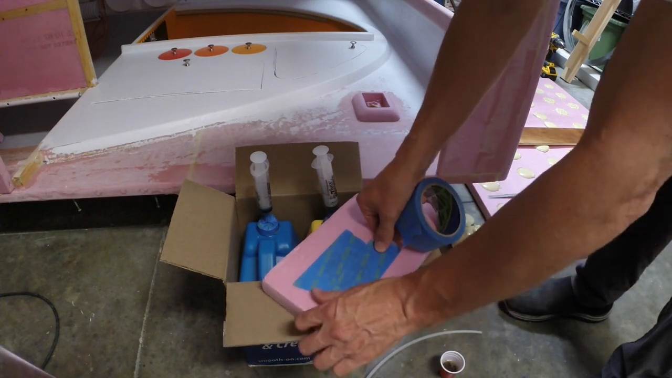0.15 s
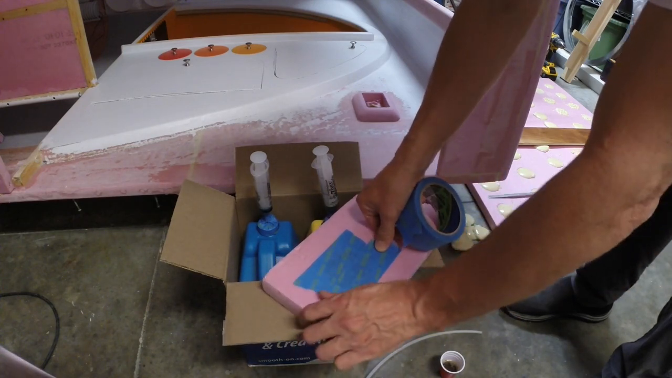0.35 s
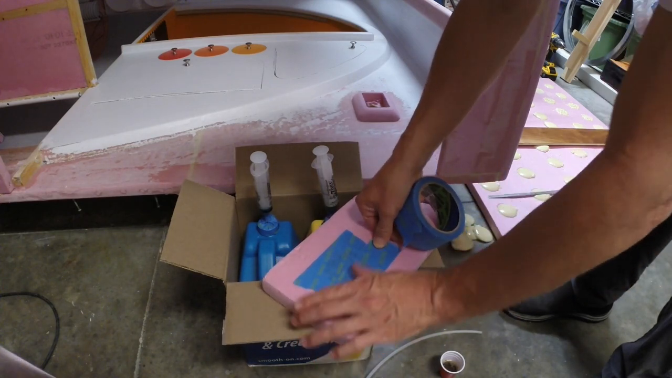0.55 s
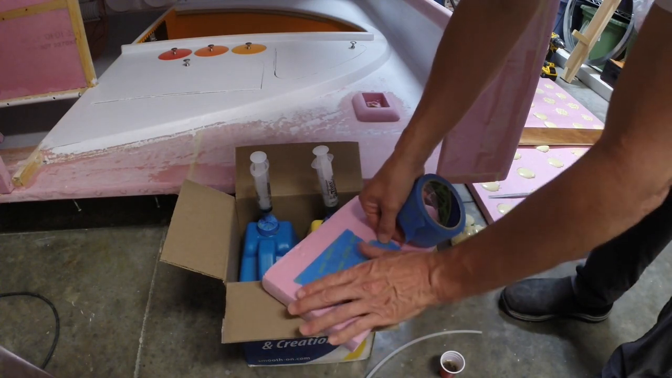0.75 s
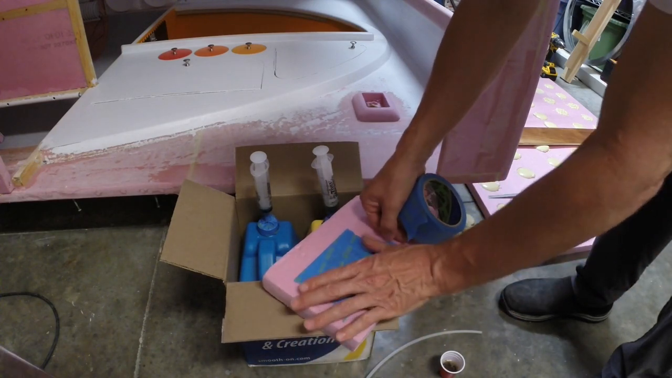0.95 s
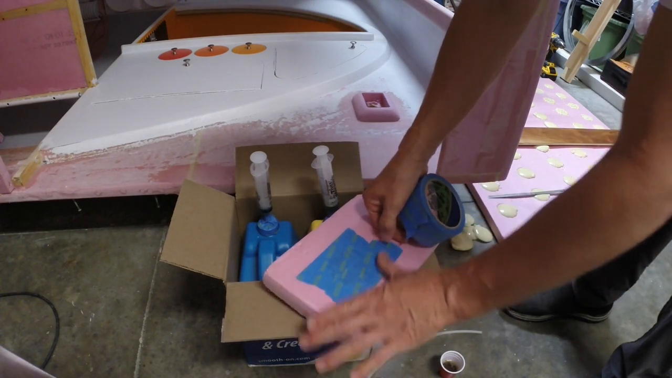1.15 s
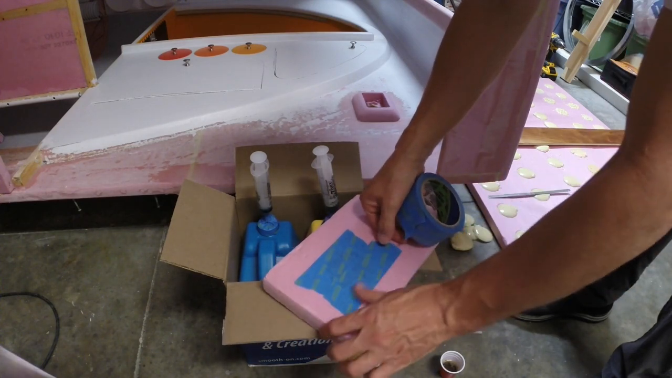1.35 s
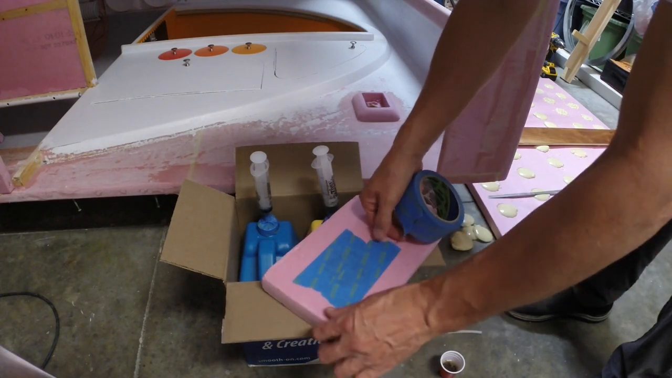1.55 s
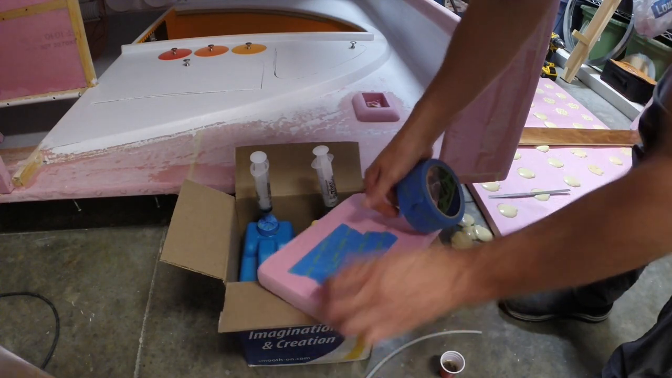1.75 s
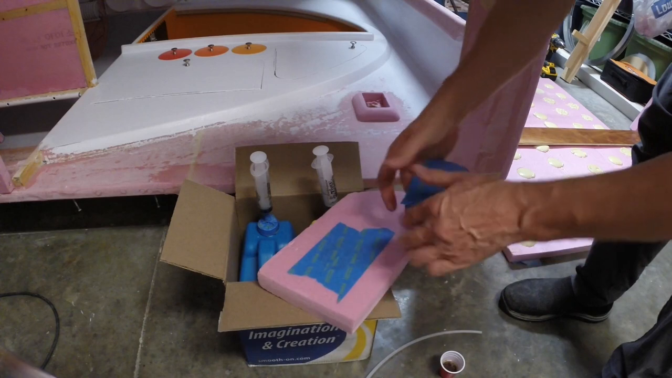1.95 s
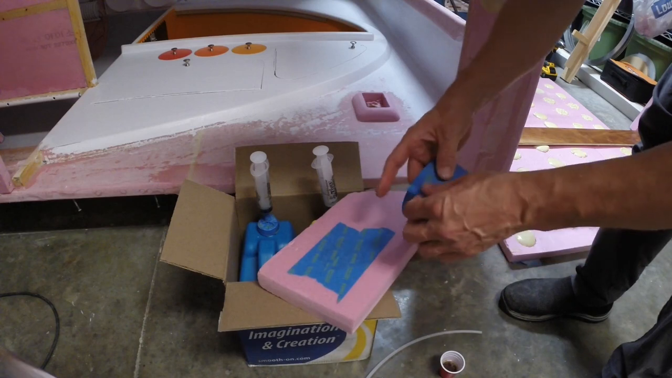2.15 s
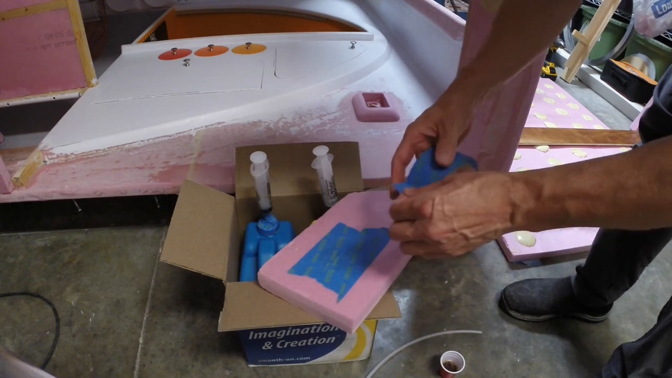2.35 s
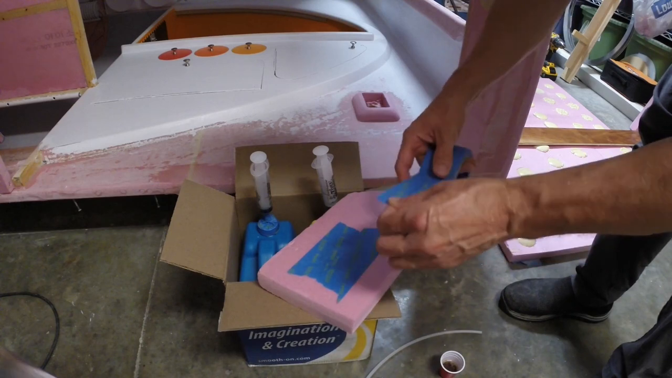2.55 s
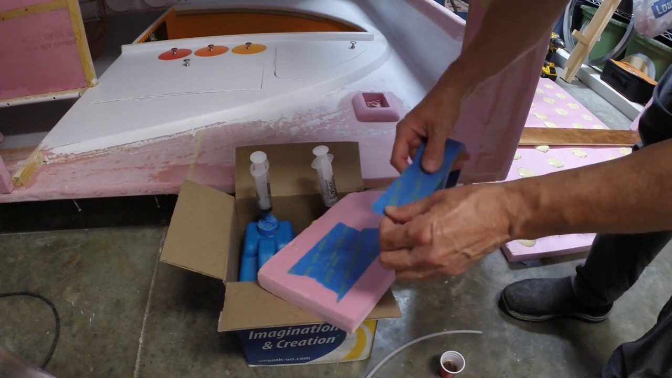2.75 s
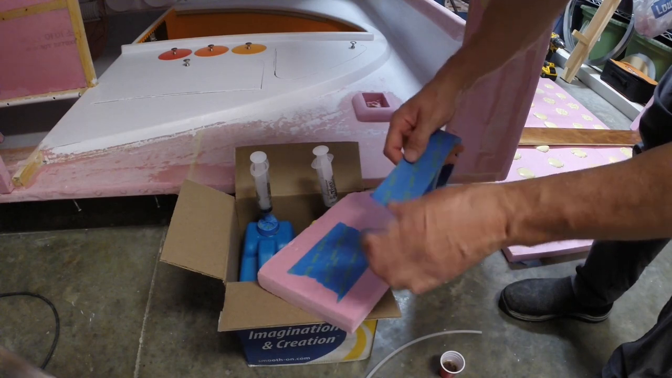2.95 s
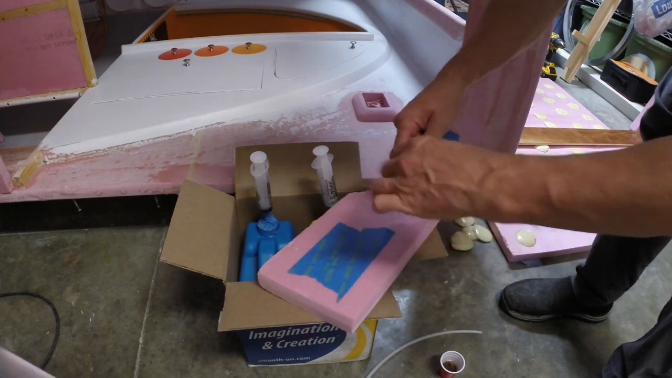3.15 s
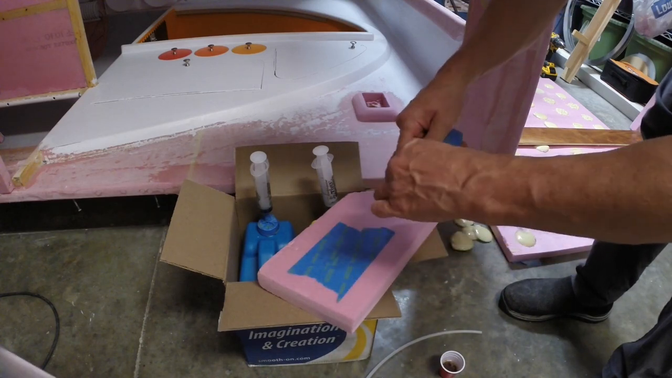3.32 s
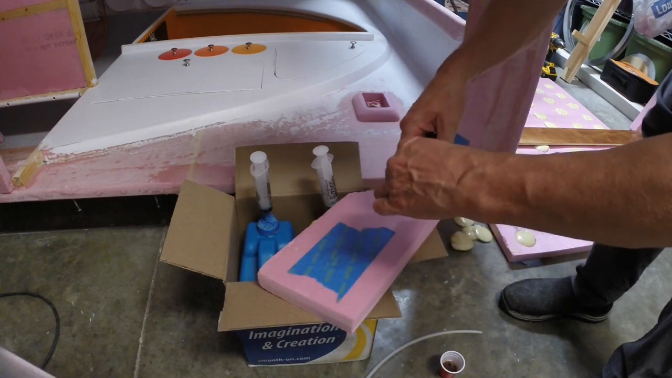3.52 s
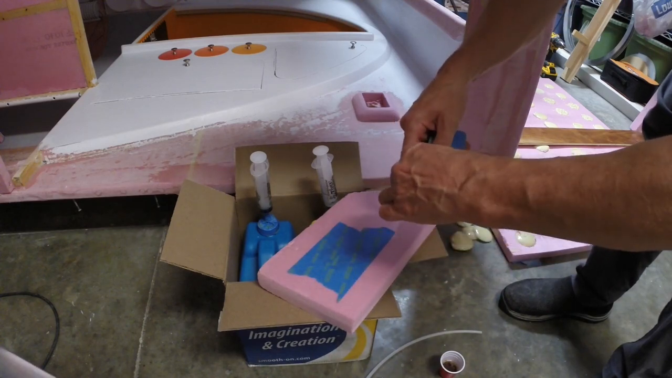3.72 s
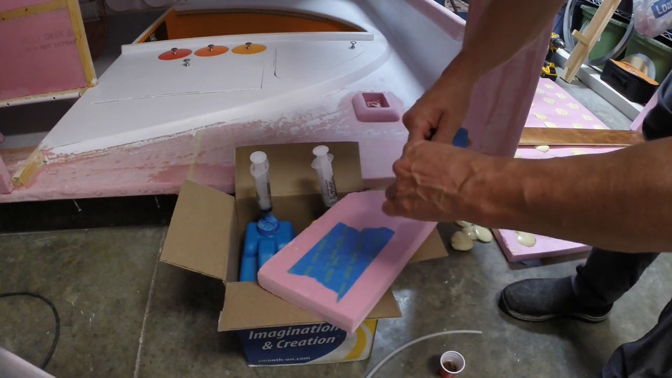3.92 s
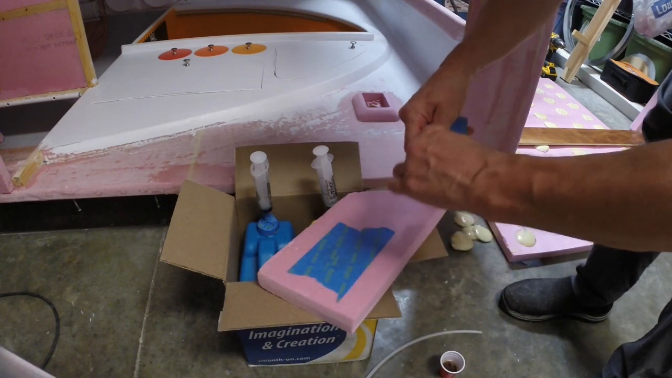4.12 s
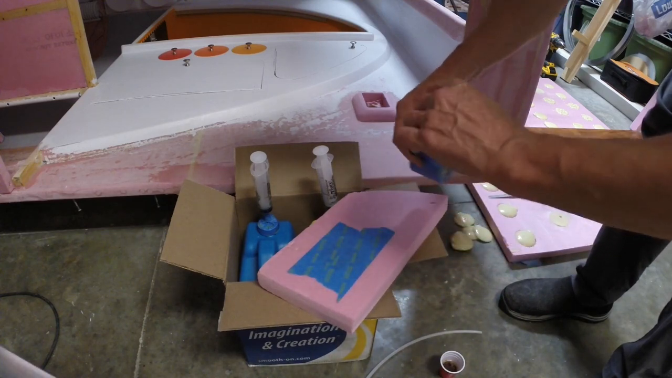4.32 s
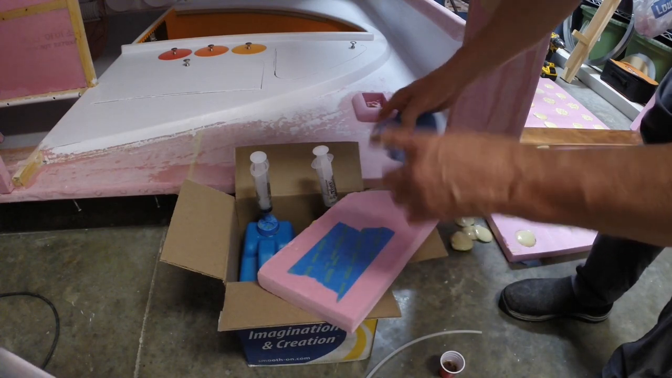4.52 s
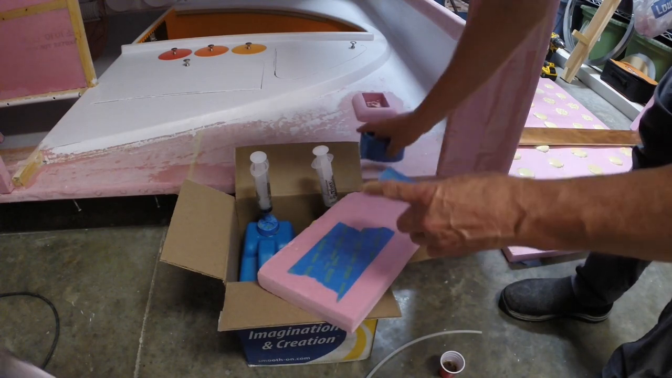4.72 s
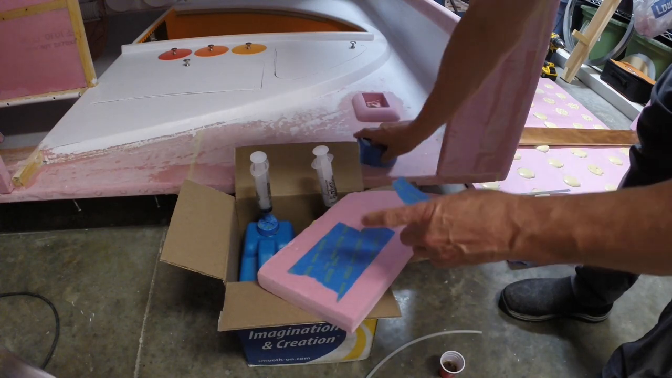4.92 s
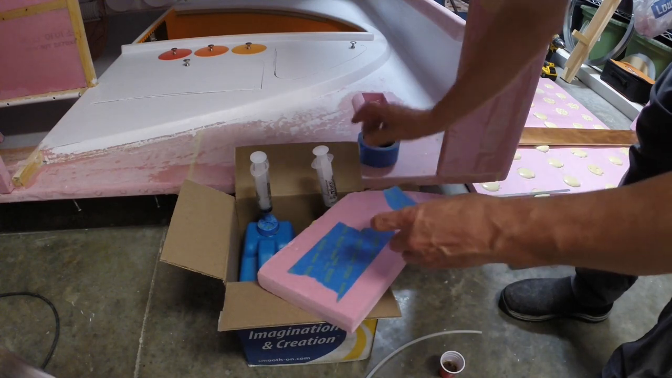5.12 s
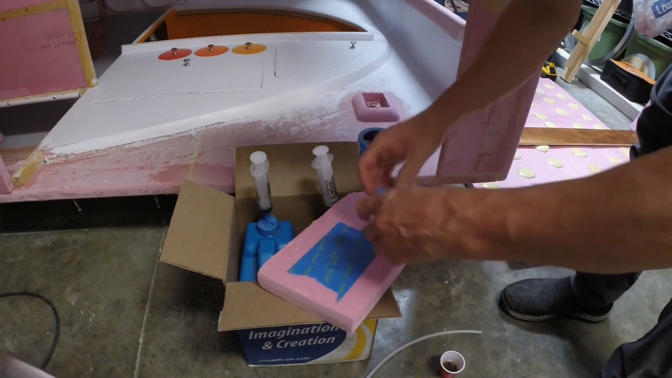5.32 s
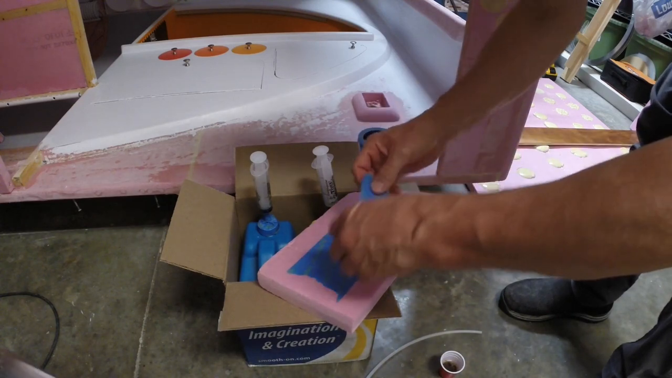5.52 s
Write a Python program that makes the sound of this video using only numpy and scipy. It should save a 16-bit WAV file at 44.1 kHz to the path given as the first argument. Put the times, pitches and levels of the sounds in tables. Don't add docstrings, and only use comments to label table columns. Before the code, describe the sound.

A palm rubs paper tape on foam board, tape is peeled in a crackling tug, torn sharply, then two dull hollow thumps.

```python
import sys
import numpy as np
from scipy import signal
from scipy.fft import rfft, irfft, next_fast_len
from scipy.io import wavfile
from scipy.ndimage import uniform_filter1d, map_coordinates

SR = 44100
rng = np.random.default_rng(int(sys.argv[2]) if len(sys.argv) > 2 else 0)


def natural_amplitude(level_db):
    exponent = np.asarray(level_db, float) / 20
    return 10 ** exponent


def wrap_up_sound(samples):
    columns = np.atleast_2d(samples).T
    tamed = np.clip(columns, -1, 1)
    steps = np.round(tamed * 32767).astype(np.int16)
    wavfile.write(sys.argv[1], SR, steps)


N = 246069
STEP = 8


def unit(x):
    return x / np.sqrt(np.mean(x ** 2) + 1e-20)


def along(points, hz):
    f, v = np.transpose(points)
    return np.interp(np.log(hz + 1), np.log(f + 1), v)


def smooth(coarse):
    return np.interp(np.arange(N), STEP * np.arange(len(coarse)), coarse)


def wobble(rate):
    knots = rng.standard_normal(int(N * 400 / SR))
    return smooth(map_coordinates(knots, [np.arange(0, N, STEP) * rate / SR]))


def swells(rows):
    t = np.arange(0, N, STEP) / SR
    power = 1e-12
    for s, db, rise, hold, fall in rows:
        before = np.maximum(s - t, 0) / rise
        after = np.maximum(t - s - hold, 0) / fall
        power = power + natural_amplitude(db - 20 * (before + after)) ** 2
    return smooth(np.sqrt(power))


def filtered(x, response):
    m = next_fast_len(len(x) + SR // 2)
    return irfft(rfft(x, m) * response(np.fft.rfftfreq(m, 1 / SR)), m)[:len(x)]


def peak(f, hz, width):
    return 1j * f * width / (hz * hz - f * f + 1j * f * width)


def grains(per_second, spread_db, clump_db, patchy_db):
    slips = (rng.random(N) < per_second / SR) * rng.standard_normal(N)
    slips = slips * natural_amplitude(spread_db * rng.exponential(size=N) + clump_db * wobble(150))
    z = signal.stft(slips, nperseg=256)[2]
    field = uniform_filter1d(rng.standard_normal(z.shape), size=3, axis=0)
    field = uniform_filter1d(field, size=9, axis=1)
    return signal.istft(z * natural_amplitude(patchy_db * unit(field)), nperseg=256)[1][:N]


def body(x, spectrum, peaks=(), lift_db=0):
    def colour(f):
        standing = sum(natural_amplitude(lift_db + db) * abs(peak(f, hz, width)) for hz, width, db in peaks)
        return natural_amplitude(along(spectrum, f)) * (1 + standing)
    return unit(filtered(x, colour))


def gliding(x, hz, shapes, width):
    f, t, z = signal.stft(x, nperseg=1024, noverlap=896, fs=SR)
    tone = hz[np.minimum((t * SR).astype(int), N - 1)]
    gain = sum(natural_amplitude(db) * abs(peak(f[:, None], k * tone, width * tone)) ** 2 for k, db in shapes)
    level = np.sqrt(np.mean(gain ** 2, axis=0))
    return unit(signal.istft(z * gain / level, nperseg=1024, noverlap=896)[1][:N])


def singing(x, rows, rise, fall, width):
    out = np.zeros(N)
    for s, db, hz, hold in rows:
        tone = unit(filtered(x, lambda f: peak(f, hz, width * hz) ** 2))
        out += swells([(s, db, rise, hold, fall)]) * tone
    return out


# full pressure in seconds, hiss in dB, rise, hold and fall in seconds.
STROKES = [(0.0, -53.5, .02, 0.0096, 0.082), (0.095, -49.5, 0.0046, 0.0078, .05),
           (0.16, -41.5, 0.061, 0, 0.19), (0.292, -44.5, 0.081, 0.0034, .06),
           (0.37, -50.5, 0.18, 0.00065, 0.37), (0.66, -42.5, 0.3, 0.11, 0.078),
           (0.89, -42.5, 0.15, 0.0038, 0.082), (0.99, -41.5, 0.043, 0.05, 0.15),
           (1.07, -46, .06, 0.0078, .12), (1.2, -40, 0.16, 0.028, 0.19), (1.3, -46, .1, 0.043, .07),
           (1.41, -44.5, 0.044, 0.12, 0.17), (1.55, -42, 0.23, 0.0054, 0.12),
           (1.79, -55, 0.22, 0.00092, 0.3)]
# frequency in Hz, level in dB per Hz.
SKIN_SPECTRUM = [(530, -23.5), (900, -0.5), (1170, -24), (1410, -1), (1710, -3), (3020, -4), (5650, -4),
                 (8560, -13), (11500, -18), (15300, -37)]
# frequency in Hz, width in Hz, level in dB.
FOAM_RESONANCES = [(1435, 130, -5), (3040, 60, 1), (3800, 110, 0), (4860, 100, 0), (5550, 170, 0),
                   (6700, 200, -3), (7200, 60, -2)]
# time in seconds, level in dB, pitch in Hz, hold in seconds.
SQUEAKS = [(.16, -58, 4870, .03), (.2, -60, 1440, .1), (0.26, -53, 453, .03), (.32, -62, 5600, .07),
           (0.542, -52, 984, .03), (.64, -54, 4800, .012), (.65, -59, 1440, .08), (0.71, -55, 3040, 0.078),
           (.72, -55, 5400, .01), (0.897, -55, 4400, .02), (.985, -52, 4270, .065), (1.02, -55, 3840, .06),
           (1.188, -51, 1400, 0.04), (1.21, -54, 3060, .04), (1.31, -60, 1460, .03),
           (1.428, -61, 5500, .05), (1.496, -52, 1410, 0.11), (1.506, -56, 5670, 0.038),
           (1.52, -56, 4840, .04)]
# frequency in Hz, level in dB per Hz.
BOARD_SPECTRUM = [(88, -52), (150, -10), (441, 2.5), (630, 3.5), (1110, -2), (1500, 0.5), (1950, -53),
                  (3300, -120)]
# time in seconds, rumble in dB, rise, hold and fall in seconds.
LEANS = [
    (0.03, -52, 0.19, 0.0055, 0.029),
    (0.16, -46.5, 0.11, 0.14, 0.042),
    (0.62, -46, 0.35, 0.011, 0.28),
    (0.96, -52.5, 0.63, 0.06, .2),
    (1.21, -49, 0.15, 0.11, 0.24),
    (1.44, -46, 0.17, 0.061, 0.21),
    (1.73, -55, 0.082, 0.0041, 0.23),
]
# time in seconds, peak in dB, pitch in Hz.
KNUCKLES = [
    (0.271, -30, 342),
    (0.498, -49, 300),
    (0.598, -37, 510),
    (0.6247, -29.5, 523),
    (0.651, -50, 415),
    (0.673, -30.5, 480),
    (1.867, -49, 80.7),
    (1.883, -35, 86.1),
]


def rubbing():
    press = swells(STROKES)
    ridge_hz = np.maximum(4100 + 42 * (20 * np.log10(press) + 27), 2050)
    drag = grains(36000, spread_db=0.8, clump_db=0.6, patchy_db=1.6)
    ridges = gliding(drag, ridge_hz, [(0.88, 0)], width=0.91)
    hiss = body(drag, SKIN_SPECTRUM, FOAM_RESONANCES, lift_db=-4.0) + natural_amplitude(-14.5) * ridges

    air_gain = natural_amplitude(-29 + 7.5 * np.arange(N) / SR)
    air = air_gain * unit(filtered(drag, lambda f: abs(peak(f, 11100, 6000)) ** 2))
    squeaks = singing(drag, SQUEAKS, rise=0.03, fall=0.03, width=0.08)

    flexing = body(grains(2500, spread_db=-0.5, clump_db=1.5, patchy_db=1.0), BOARD_SPECTRUM)
    rumble = np.hypot(natural_amplitude(-16.5) * press, swells(LEANS)) * flexing
    out = natural_amplitude(-1.5) * (press * (hiss + air) + squeaks + rumble)

    t = np.arange(SR // 20) / SR
    for s, db, hz in KNUCKLES:
        bump = natural_amplitude(db - 60 * t / 0.014) * np.sin(2 * np.pi * hz * t)
        out[round(s * SR):][:len(t)] += bump
    return out


# frequency in Hz, level in dB per Hz.
HUM_SPECTRUM = [(13, -66), (22, -0.5), (97, -7), (202, -7), (266, -7.5), (331, -12), (401, -10),
                (447, -12.5), (732, -17), (990, -16.5), (3890, -27.5), (6030, -31), (15300, -42.5)]
# frequency in Hz, level in dB per Hz.
RUMBLE_SPECTRUM = [(25, -32), (45, 2.5), (80, 7.5), (150, -1), (300, -36)]
# time in seconds, level in dB, rise, hold and fall in seconds.
SHIFTS = [
    (0.2, -68, .3, 0.44, 2),
    (1.6, -58, 2, 0, 0.34),
    (1.9, -54.5, 0.12, 0, 0.12),
    (2.65, -63.5, 0.88, 0.036, .2),
    (3.88, -57, 0.086, 0.025, 0.28),
    (4.22, -60, 0.18, 0.11, 0.38),
    (4.86, -60, 0.53, 0, .07),
    (5.2, -55, .05, 0.029, 0.43),
]


def hum():
    air = natural_amplitude(-56.5 + 0.9 * wobble(4.6)) * body(rng.standard_normal(N), HUM_SPECTRUM)
    rumble = np.hypot(natural_amplitude(-70), swells(SHIFTS)) * body(rng.standard_normal(N), RUMBLE_SPECTRUM)
    return air + rumble


# time in seconds, level in dB, rise, hold and fall in seconds.
FLICKS = [
    (1.8615, -40.5, .0006, 0.0063, .04),
    (1.877, -36.5, 0.025, 0.0051, 0.023),
    (1.9, -47, .01, 0.013, 0.082),
]
# frequency in Hz, level in dB per Hz.
SWIPE_SPECTRUM = [(120, -28), (200, -6), (605, -13.5), (809, -1), (1120, -9), (1420, 0), (1730, -6.5),
                  (3920, -4), (15300, -23)]
# time in seconds, level in dB, rise and fall in seconds.
TOUCHES = [(1.98, -67, .03, 0.17), (2.271, -60, .25, 0.038), (2.41, -61.5, .25, .02),
           (2.73, -72.5, .02, 0.16), (2.86, -57, 0.025, 0.17), (2.93, -49.5, .005, 0.096),
           (2.99, -56, .05, .015), (3.055, -60, .04, .03), (3.089, -64, .05, .04),
           (3.341, -64, 0.039, 0.23), (3.555, -54.5, 0.075, 0.095), (3.572, -37.5, 0.0066, 0.038),
           (3.6, -55.5, .01, 0.22), (3.83, -57, 0.054, 0.18), (4.04, -68, .07, 1), (4.41, -53, .01, 0.28),
           (4.595, -43, .002, 0.053), (4.633, -47.5, .006, 0.024), (4.694, -58.5, 0.099, 1),
           (4.839, -48, 0.0049, 0.038), (5.3, -85, .3, 0.046), (5.469, -56, .002, .15),
           (5.537, -43.5, .003, .03), (5.56, -49.5, 0.044, 0.052)]
# frequency in Hz, level in dB per Hz.
PAPER_SPECTRUM = [(350, -29), (600, 10.5), (842, -8), (1370, -1), (2140, 2.5), (2420, 4), (4220, 3.5),
                  (7070, 1), (9650, -8.5), (11100, -6.5), (15300, -24)]
# frequency in Hz, width in Hz, level in dB.
CREASE_RESONANCES = [(5400, 520, -4.5), (6800, 100, -11)]
# time in seconds, level in dB, rise, hold and fall in seconds.
SCUFFS = [
    (4.928, -48, .001, 0.091, 0.12),
    (5.086, -56.5, 0.0044, 0.016, 0.083),
]
# frequency in Hz, level in dB per Hz.
SCUFF_SPECTRUM = [(530, -19), (900, 6.5), (966, -8.5), (1750, -3), (1900, 2), (2040, -5), (7080, -8.5),
                  (13100, -32), (15300, -46)]


def rustling():
    swipe = body(grains(17000, spread_db=-1.3, clump_db=0.5, patchy_db=1.9), SWIPE_SPECTRUM)
    shifting = grains(14000, spread_db=-5.0, clump_db=2.0, patchy_db=2.0)
    rustle = body(shifting, PAPER_SPECTRUM, CREASE_RESONANCES, lift_db=-3.0)
    scuff = body(grains(22000, spread_db=0.5, clump_db=-1.5, patchy_db=1.5), SCUFF_SPECTRUM)
    touch = swells([(s, db, rise, 0, fall) for s, db, rise, fall in TOUCHES])
    return touch * rustle + swells(FLICKS) * swipe + swells(SCUFFS) * scuff


# time in seconds, crackle in dB, rise, hold and fall in seconds.
PULL = [
    (2.47, -40.5, 0.05, 0.0084, 0.11),
    (2.51, -39, 0.047, 0.038, 0.21),
    (2.6, -41.5, 0.1, 0.051, 0.053),
]
# frequency in Hz, level in dB per Hz.
GLUE_SPECTRUM = [(410, -15), (700, -8.5), (942, -1.5), (1200, -9), (1520, -6.5), (2240, -13), (3340, -9.5),
                 (5960, -8), (11500, -25.5), (15300, -32)]
# frequency in Hz, width in Hz, level in dB.
CORE_RESONANCES = [(1460, 94, -31), (2030, 70, 6), (2733, 38, 18.5), (3250, 170, 12.5), (3960, 35, 10)]
# multiple of its tone, level in dB.
STRIP_SHAPES = [(1, 0), (1.7, -10), (3.7, -5), (6, -10)]
# time in seconds, level in dB, rise, hold and fall in seconds.
SAG = (2.635, -46.5, 0.01, 0.0448, 0.01)
# time in seconds, level in dB, pitch in Hz, hold in seconds.
SQUEALS = [
    (2.458, -50, 3300, .025),
    (2.462, -51, 2050, .025),
    (2.488, -48, 1500, .006),
    (2.508, -48, 3450, .005),
    (2.526, -46, 2780, .01),
    (2.51, -49, 950, .02),
    (2.54, -50, 500, .008),
    (2.6, -53, 3250, .045),
    (2.64, -57, 950, .012),
]


def peeling():
    short_hz, long_hz = 2050, 279
    freed = np.clip((np.arange(N) / SR - 2.458) / 0.17, 0, 1)
    length = 1 + (short_hz / long_hz - 1) * freed ** 1.5
    octaves = np.log2(length)
    tone = short_hz / length * np.exp(0.04 * wobble(55))

    slips = grains(26000, spread_db=1.17, clump_db=-0.1, patchy_db=2.0)
    crackle = body(slips, GLUE_SPECTRUM, CORE_RESONANCES, lift_db=-5.5)
    flutter = natural_amplitude(-2.5 - 2 * octaves) * gliding(slips, tone, STRIP_SHAPES, width=0.34)
    drone = gliding(slips, tone, [(0.99, 0)], width=0.17)
    pulled = swells(PULL) * (crackle + flutter + natural_amplitude(-13 - 3 * octaves) * drone)
    squeals = singing(slips, SQUEALS, rise=0.015, fall=0.016, width=0.13)
    return natural_amplitude(-1.3) * pulled + swells([SAG]) * drone + squeals


# time in seconds, peak in dB, ring in Hz.
JERKS = [
    (2.4915, -31, 1500),
    (2.5145, -30, 1000),
    (2.5245, -29, 900),
    (2.532, -34, 800),
    (2.543, -29, 700),
    (2.58, -32, 900),
    (2.6, -33, 1300),
    (2.6485, -32, 1000),
]
# time in seconds, peak in dB, ring in Hz.
TICKS = [(2.777, -47, 5184), (2.851, -46, 5000), (2.857, -42, 5050), (2.868, -42, 5200), (2.878, -46, 5100),
         (2.889, -46, 5000), (2.915, -37, 5000), (2.951, -40, 4700), (2.974, -40, 3820),
         (2.9915, -38.5, 5280), (2.995, -39, 3500), (3.037, -45, 5200), (3.043, -48, 5200),
         (3.0516, -36, 5160), (3.0845, -42, 5150), (3.091, -48, 5170), (3.34, -46, 5170), (3.36, -48, 4530),
         (3.5278, -35, 5030), (3.6395, -34, 1100), (3.6405, -40, 2400), (3.8056, -44, 3390),
         (3.8222, -36, 5260), (3.9319, -36, 1150), (3.936, -42, 2300), (4.571, -31, 1960),
         (4.603, -40, 800), (4.628, -33, 4450), (4.634, -33, 2020), (4.835, -32, 1000), (4.835, -31, 2900)]
# time in seconds, peak in dB, ring in Hz, dull part in dB, air in dB.
SNAPS = [(2.9236, -25, 5400, -10, -20), (3.568, -29.5, 5550, -10, -19), (3.572, -26.5, 4700, -5.5, -27),
         (3.6396, -40.5, 3600, -0.5, -28), (3.822, -31.5, 2800, -10.5, -37), (3.9323, -42, 3580, -2, -30),
         (4.5706, -27.5, 3390, -14, -32), (4.5933, -34, 3360, -8, -19), (4.634, -34.5, 5750, -19, -28),
         (4.8354, -26, 5040, -11, -13), (4.9282, -38, 4670, -12, -37), (5.0847, -44.5, 2530, 0, -38),
         (5.476, -48.5, 2930, 5.5, -22), (5.48, -36, 3000, -2.5, -18), (5.543, -29, 6040, -10.5, -28),
         (5.4845, -35.5, 2650, -7, -30)]
# time in seconds, peak in dB, ring in Hz, dull part in dB, air in dB.
CLICKS = [
    (4.243, -28, 4500, -12, -18),
    (4.259, -21, 3200, -15, -20),
    (4.2613, -16, 4800, -13, -16),
    (4.594, -33, 4500, -14, -15),
    (4.629, -28, 5500, -24, -20),
    (4.8475, -35, 6000, -16, -13),
]
# time in seconds, peak in dB, ring in Hz.
BREAKS = [(4.2671, -18, 3000), (4.2775, -19, 3300), (4.2852, -17, 4000), (4.2867, -15, 3900),
          (4.2897, -13, 3000), (4.2927, -17, 3300), (4.3015, -16, 4800), (4.3058, -15, 3900),
          (4.3112, -15, 3600), (4.317, -16, 3500), (4.3247, -14, 5300), (4.333, -20, 4000)]


def fingers():
    # dull part and air in dB where missing, then t60 in seconds and width as a share of the ring
    rows = [(*row, 0.014, 0.47) for row in SNAPS]
    rows += [(*row, 0.003, 0.8) for row in CLICKS]
    rows += [(*row, -32, -34, 0.014, 0.22) for row in TICKS]
    rows += [(*row, -17, -20, 0.003, 0.8) for row in [*BREAKS, *JERKS]]
    out = np.zeros(N + SR)
    t = np.arange(SR // 10) / SR
    for s, db, hz, dull_db, air_db, t60, width in rows:
        def colour(f):
            ring = 1.23 * peak(f, hz, width * hz) ** 2
            dull = natural_amplitude(dull_db + 9) * peak(f, 1250, 1700) ** 2
            air = natural_amplitude(air_db + 6.0) * peak(f, 10100, 4050) ** 2
            return ring + dull + air
        burst = rng.standard_normal(len(t)) * natural_amplitude(-60 * t / t60) * (1 - np.exp(-t / 0.00027))
        blow = burst + 3 * (t == 0)
        out[round(s * SR):][:len(t)] += natural_amplitude(db + 3.5) * filtered(blow, colour)
    return filtered(out[:N], lambda f: 1 / np.sqrt(1 + (f / 11500) ** 8))


# time in seconds, level in dB, pitch in Hz.
PINGS = [
    (2.9233, -11.5, 5300),
    (2.9349, -25, 6400),
    (4.5933, -26, 3300),
    (4.629, -25, 4700),
    (4.8352, -18, 5250),
]


def pings():
    out, t = np.zeros(N), np.arange(SR // 50) / SR
    for s, db, hz in PINGS:
        envelope = natural_amplitude(db - 60 * t / 0.005) * (1 - np.exp(-t / 0.0004))
        out[round(s * SR):][:len(t)] += envelope * np.sin(2 * np.pi * hz * t)
    return out


# time in seconds, level in dB, rise, hold and fall in seconds.
RIP = [
    (4.2435, -38, 0.00093, 0.011, 0.011),
    (4.26, -31, .0015, 0.0017, 0.047),
    (4.278, -26, 0.0085, .005, 0.038),
    (4.292, -24.5, 0.03, 0.03, 0.029),
    (4.345, -41.5, .02, 0.021, 0.062),
]
# frequency in Hz, level in dB per Hz.
FIBRE_SPECTRUM = [(180, -47), (300, -21), (500, -35), (599, -20), (1120, -10), (1500, -12.5), (1720, -8),
                  (2310, -8.5), (3840, -4.5), (11200, -19), (15300, -37)]
# frequency in Hz, width in Hz, level in dB.
TAUT_RESONANCES = [(3390, 75, -3.5), (4000, 180, -13), (5520, 90, 1), (6960, 200, 2.5), (7550, 30, -14),
                   (11000, 81, -16), (11700, 53, -14)]
# time in seconds, level in dB, pitch in Hz, hold in seconds.
TWANGS = [
    (4.262, -37, 3200, .008),
    (4.282, -34, 6900, 0.011),
    (4.289, -29, 2900, .005),
    (4.31, -34, 5650, .006),
    (4.325, -33, 5700, .004),
    (4.272, -38, 1600, .012),
]


def tearing():
    rip = grains(26000, spread_db=1.2, clump_db=2.2, patchy_db=1.5)
    rush = swells(RIP) * body(rip, FIBRE_SPECTRUM, TAUT_RESONANCES, lift_db=0.5)
    twangs = singing(rip, TWANGS, rise=0.004, fall=0.008, width=0.16)
    started = np.arange(N) / SR > RIP[0][0] - 0.001
    return started * (rush + twangs)


# time in seconds, boom in dB, hold and fall in seconds.
LANDINGS = [
    (4.926, -20, 0.032, 0.016),
    (5.081, -18, 0.057, 0.072),
]
# level in dB, fall in seconds.
SLAPS = [
    (-37.5, 0.17),
    (-24.5, 0.1),
]
# frequency in Hz, level in dB.
PANEL_MODES = [
    [(95, -9), (124, -4), (151, 2.5), (200, -9), (280, -13), (355, -22), (420, -25), (571, -30), (678, -33),
     (856, -34)],
    [(68, -20), (92, -10), (124, -3), (161, 2.5), (234, -8), (277, -1), (312, -20), (357, -13), (402, -19),
     (436, -19), (526, -21), (624, -24), (807, -28), (969, -35)],
]
IN_STEP_S = [
    .0238,
    .025,
]
# frequency in Hz, level in dB per Hz.
SLAP_SPECTRUM = [(180, -13), (300, -4), (486, -14), (801, -22.5), (1060, -33.5), (1290, -33), (1960, -42),
                 (3000, -48), (3900, -80), (6600, -120)]
# time in seconds, boom in dB, rise, hold and fall in seconds.
REBOUNDS = [
    (4.983, -26, 0.012, 0.0071, 0.029),
    (5.033, -39, .02, 0.0083, 0.03),
    (5.186, -25, .015, 0.0045, 0.018),
    (5.23, -31.5, 0.011, 0.013, 0.044),
]
# time in seconds, peak in dB, pitch in Hz, t60 in seconds.
KNOCKS = [
    (4.926, -35, 390, 0.029),
    (4.929, -38, 690, .05),
    (5.083, -20, 506, 0.042),
    (5.0845, -23.5, 800, 0.045),
    (5.084, -37.5, 1100, .04),
    (5.086, -50, 2600, .03),
]


def thumps():
    ring_db, ring_fall = -20.5, 0.21
    out = np.zeros(N)
    landings = zip(LANDINGS, SLAPS, PANEL_MODES, IN_STEP_S)
    for (s, boom_db, hold, fall), (slap_db, slap_fall), modes, in_step in landings:
        t = np.arange(N) / SR - s
        since = np.maximum(t, 0)
        ring = np.zeros(N)
        for hz, db in modes:
            lag = np.pi / 2 * (hz > 190)
            phase = 2 * np.pi * hz * (t - in_step) - lag + hz / 900 * wobble(14)
            build = 1 - np.exp(-since * hz / 0.57)
            ring += natural_amplitude(db + 1.5 * wobble(28)) * np.cos(phase) * build
        ring = ring / np.std(ring[t > 0])
        slap = body(grains(15000, spread_db=0.0, clump_db=1.5, patchy_db=0.5), SLAP_SPECTRUM)

        contact = 1 - np.exp(-since / 0.0014)
        rocking = [row for row in REBOUNDS if 0 < row[0] - s < 0.155]
        boom = swells([(s, boom_db, 1, hold, fall),
                       (s, boom_db + ring_db, 1, hold + fall, ring_fall)] + rocking)
        slap_gain = swells([(s, slap_db, 1, 0.03, slap_fall),
                            (s, slap_db + ring_db, 1, slap_fall, ring_fall)])
        out += contact * (boom * ring + slap_gain * slap)

    t = np.arange(SR // 10) / SR
    for s, db, hz, t60 in KNOCKS:
        out[round(s * SR):][:len(t)] += natural_amplitude(db - 60 * t / t60) * np.sin(2 * np.pi * hz * t)
    return out


# frequency in Hz, t60 in seconds.
SHOP_DECAY = [(100, 0.15), (600, 0.31), (3000, 0.28), (8000, 0.35), (15000, 0.3)]


def shop(x):
    hz, t, z = signal.stft(rng.standard_normal(SR // 2), SR, nperseg=256)
    decay = natural_amplitude(-60 * t / along(SHOP_DECAY, hz)[:, None])
    tail = signal.istft(z * decay, SR, nperseg=256)[1]
    late = np.pad(x, (150, 0))
    return signal.fftconvolve(late, tail / np.linalg.norm(tail))[:N]


def scene():
    steady = rubbing() + peeling() + rustling()
    rip, snaps, low = tearing(), fingers(), thumps()
    bench = natural_amplitude(-14.5) * np.pad(snaps, (round(0.0117 * SR), 0))[:N]
    wet = natural_amplitude(-8.5) * shop(steady) + natural_amplitude(-3.5) * shop(rip)
    wet += natural_amplitude(-6.5) * shop(snaps) + natural_amplitude(-13.5) * shop(low)
    return (steady + rip + snaps + pings() + bench + low + wet + hum())[None]


def low_pass(x):
    return signal.sosfilt(signal.butter(12, 16370, fs=SR, output="sos"), x)


def record(dry):
    mix = filtered(dry[0], lambda hz: hz < 15400)[None]
    return low_pass(mix)


dry = scene()
out = record(dry)
wrap_up_sound(out)
```